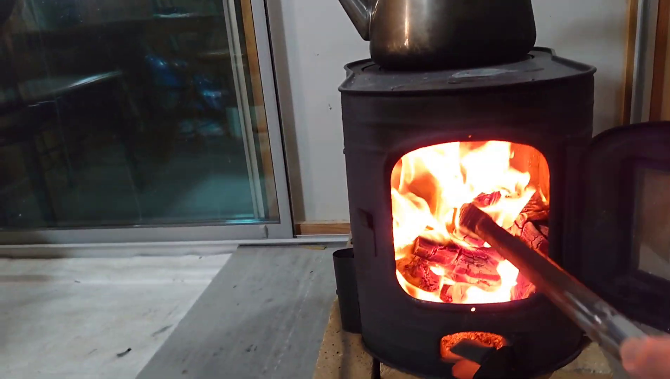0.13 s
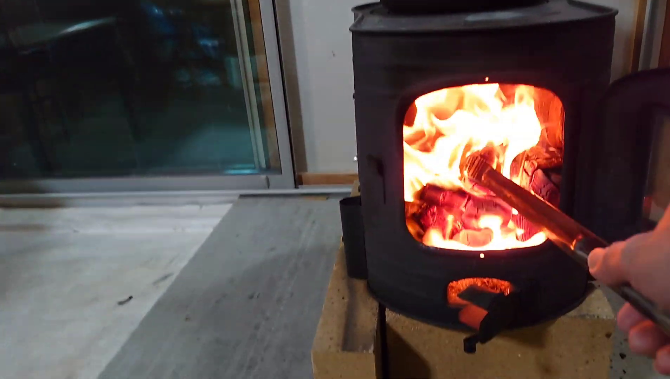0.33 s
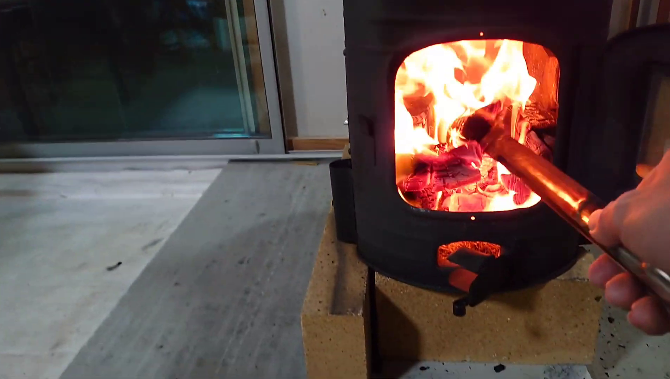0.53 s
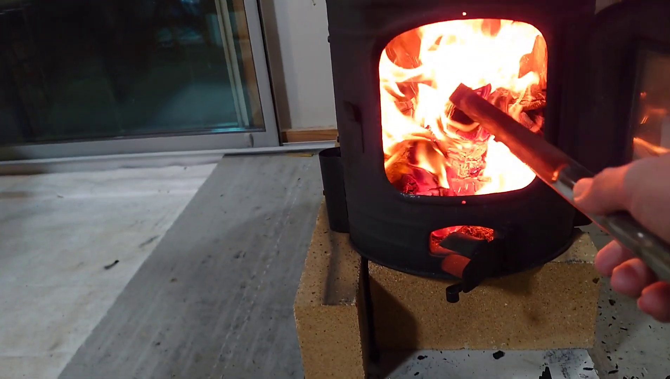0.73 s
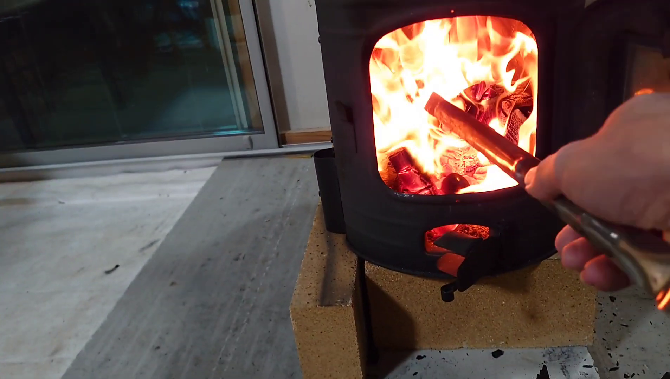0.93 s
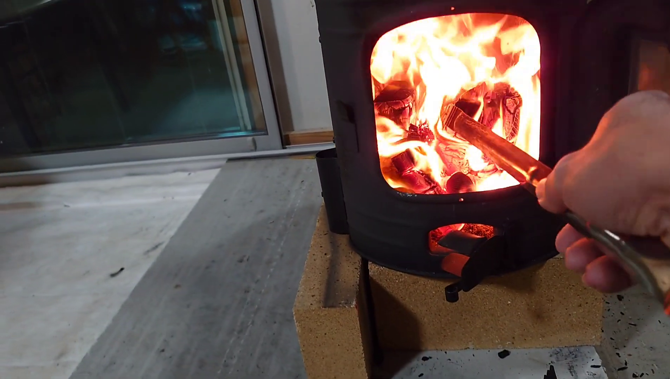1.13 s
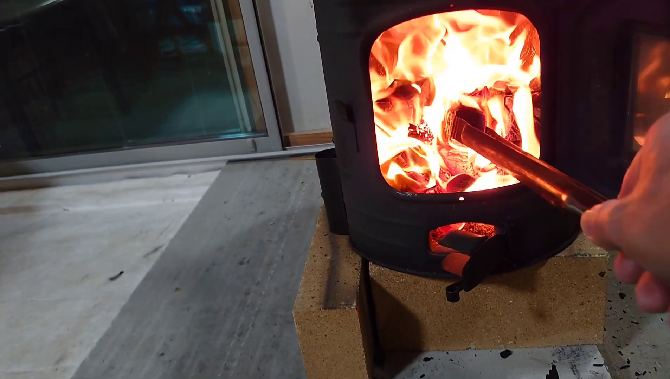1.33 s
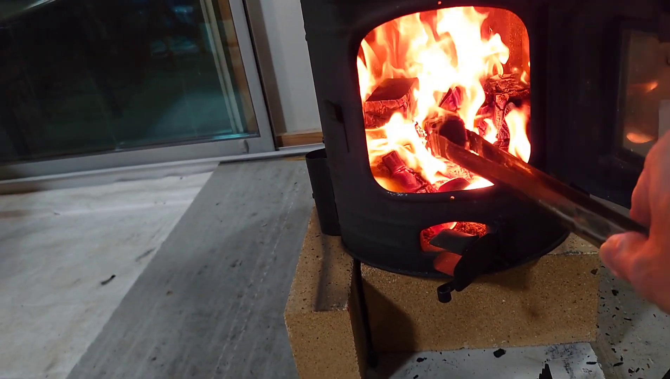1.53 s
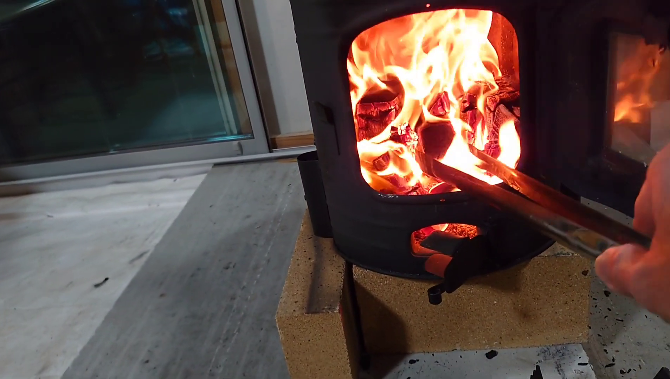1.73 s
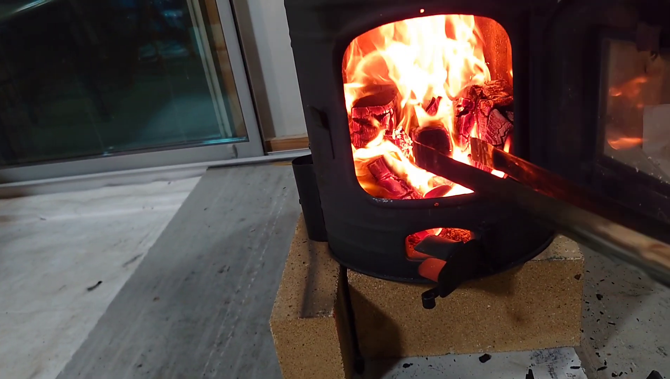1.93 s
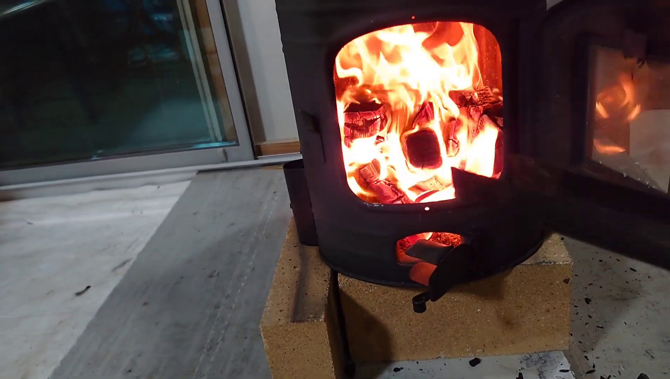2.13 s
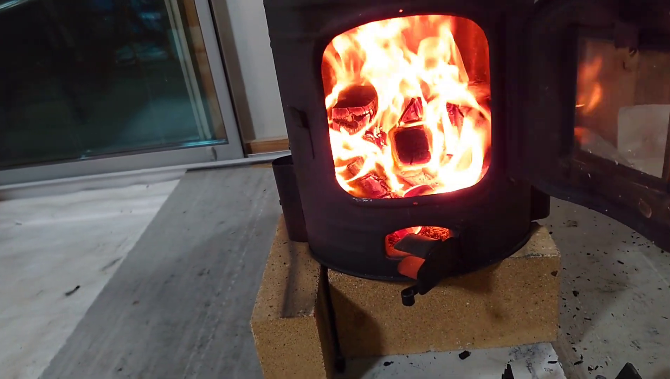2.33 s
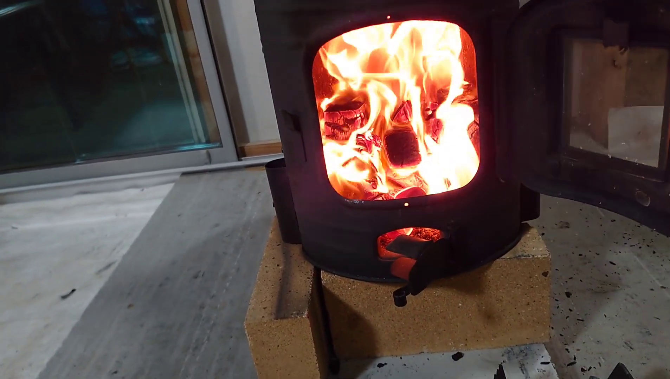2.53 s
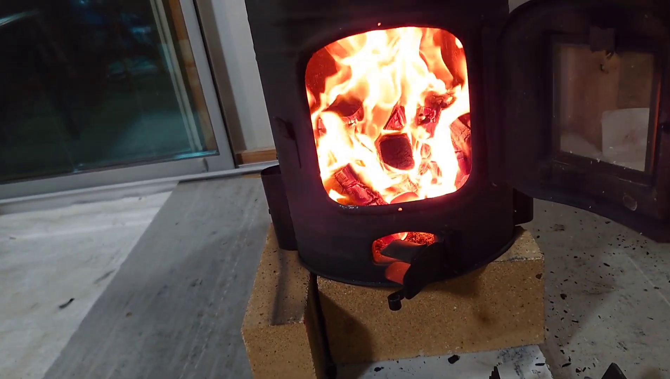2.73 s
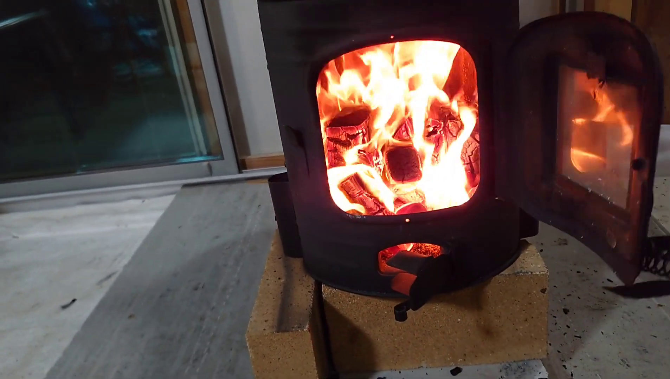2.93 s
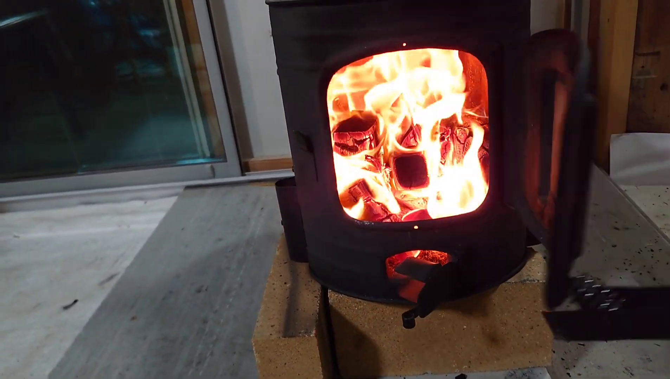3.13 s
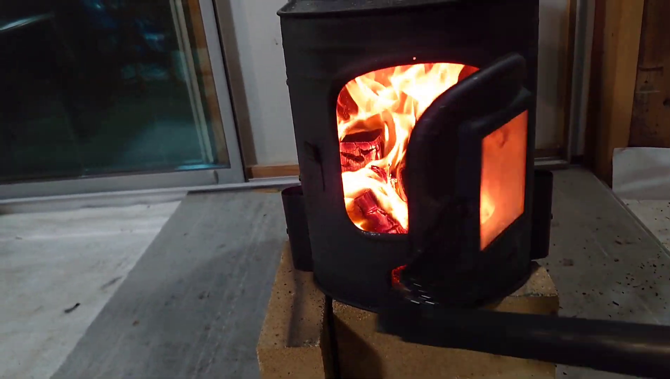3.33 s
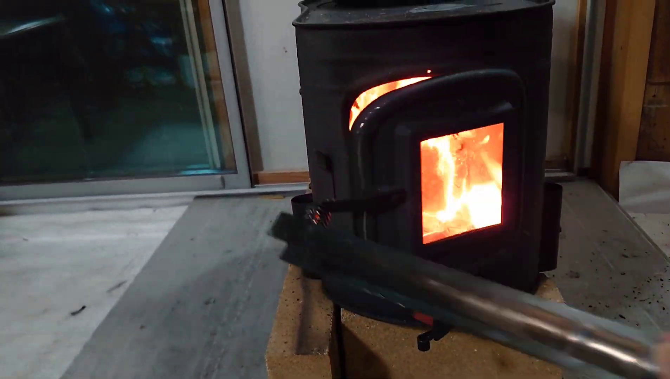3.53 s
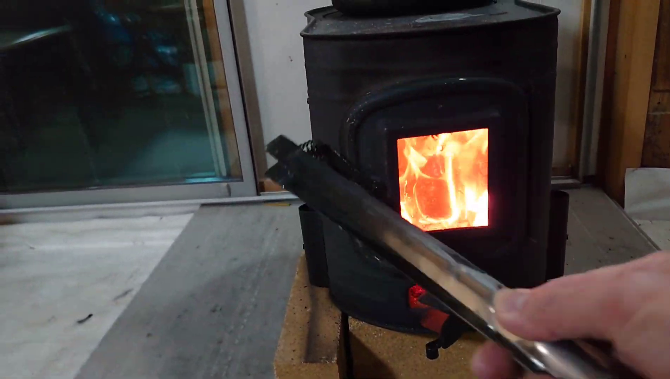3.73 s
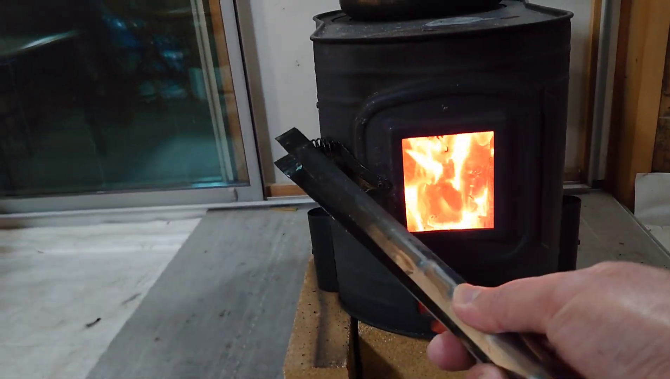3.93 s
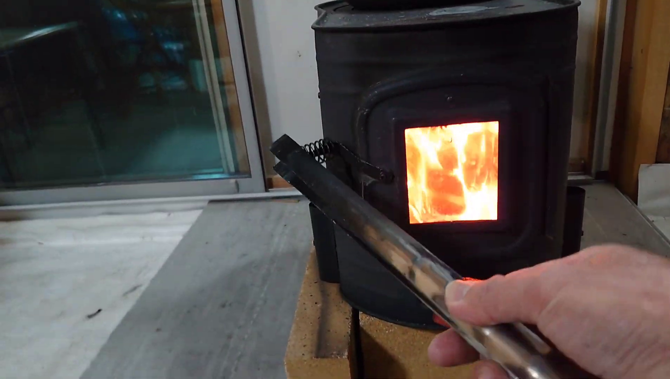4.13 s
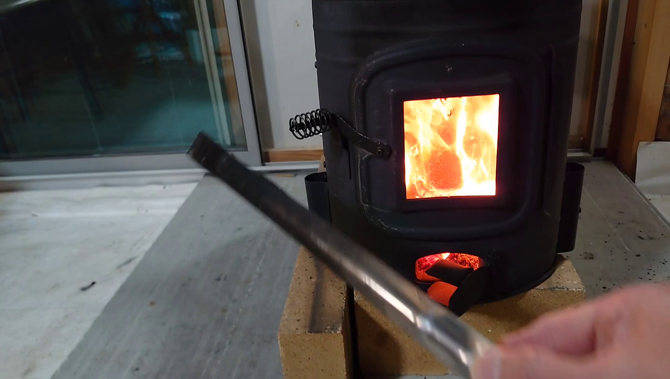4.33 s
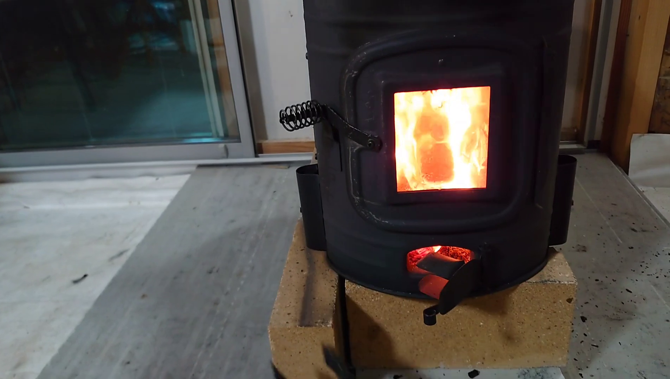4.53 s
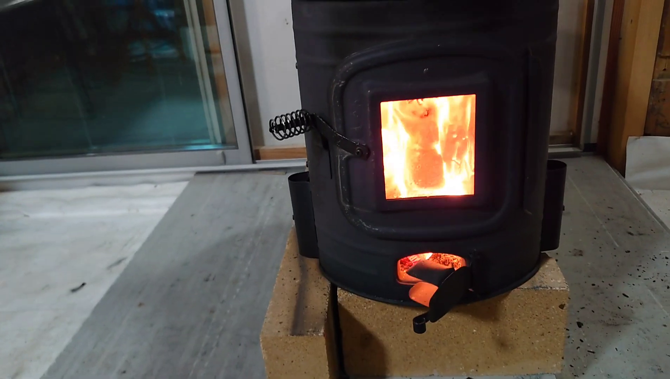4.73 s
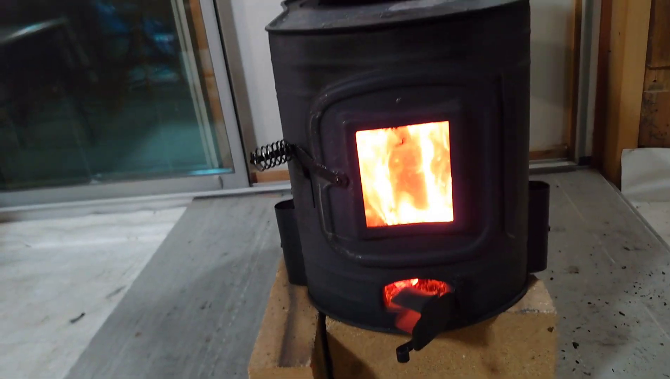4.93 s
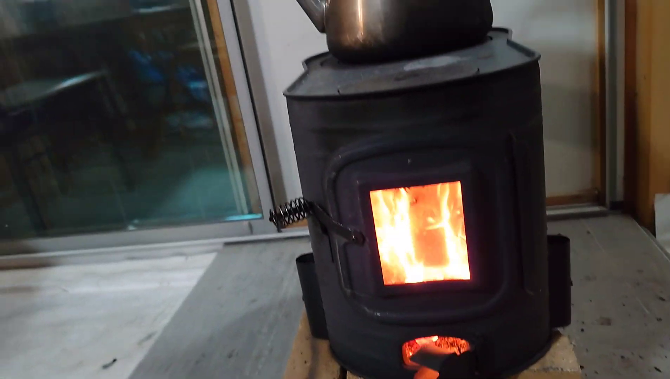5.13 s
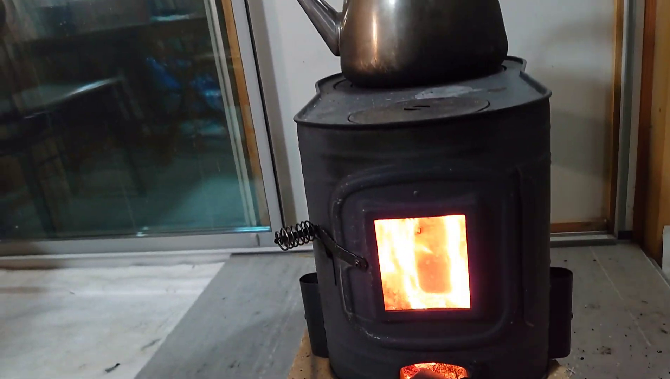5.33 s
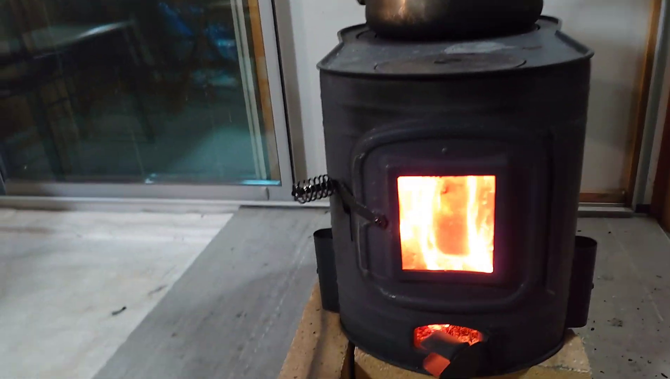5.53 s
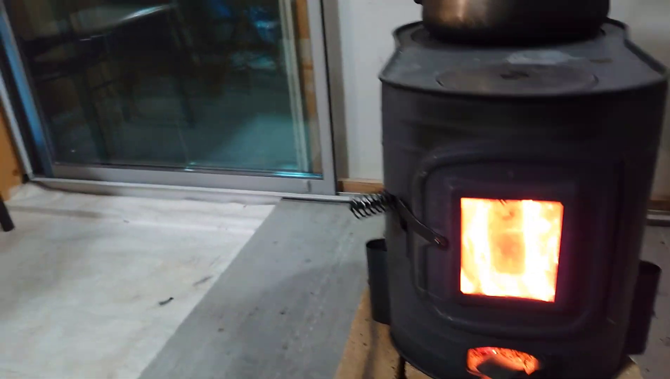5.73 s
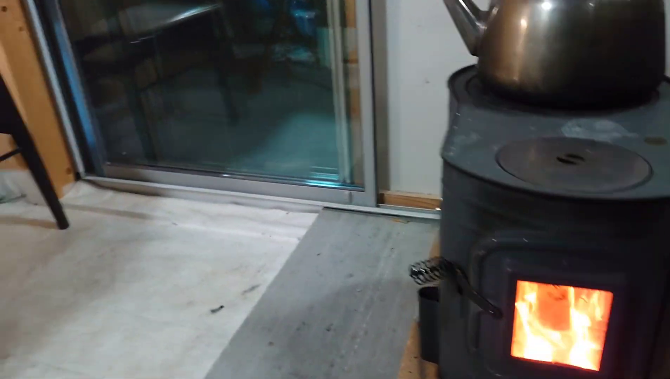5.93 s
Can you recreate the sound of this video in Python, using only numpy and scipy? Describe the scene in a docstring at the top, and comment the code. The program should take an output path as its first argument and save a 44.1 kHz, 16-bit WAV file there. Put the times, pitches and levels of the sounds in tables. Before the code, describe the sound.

Steel tongs poke logs in a wood stove, push its metal door shut, then clatter loudly onto the floor over a softly burning fire.

```python
"""Tongs at a wood stove

Close to a sheet-metal stove in a hard-walled room, on a stereo pair of microphones. Steel tongs push logs
into the fire, swing the door shut by its handle and are dropped on the floor. Each contact shakes the
drum, door or boards, the plates and edges, and the arms of the tongs. Sliding steel squeaks, and the
dropped tongs ring as they bounce. Behind the handling the flames murmur and the burning wood ticks."""
import sys
import numpy as np
from scipy import signal
from scipy.fft import rfft, irfft, next_fast_len
from scipy.io import wavfile
from scipy.ndimage import uniform_filter1d

SR = 44100
rng = np.random.default_rng(int(sys.argv[2]) if len(sys.argv) > 2 else 0)


def file_out(sig):
    """Save sig as 16-bit WAV at sys.argv[1]."""
    # one column per channel
    cols = np.atleast_2d(sig).T
    # limit, then scale
    lim = np.clip(cols, -1, 1)
    pcm = np.round(lim * 32767).astype(np.int16)
    wavfile.write(sys.argv[1], SR, pcm)


N = 263416
LOG_S, DOOR_S, DROP_S, LET_GO_S = 1.75, 2.25, 4.75, 5.15  # tongs reach log, door, floor; leave the hand

# Blows of the tongs. Weight (body), brightness (fizz) and ring (tongs) are relative to the strength:
# (time [s], strength [dB], weight [dB], brightness [dB], ring [dB], chatter decay [s])
BLOWS = [(0.046, -67.5, 30, -6, -7, 0.0046), (0.333, -57.5, 8.5, -29, -18, 0.00084),
         (.463, -55, 4.5, -5, -3, 0.0035), (0.648, -50.5, -18, -6.5, -16, 0.001),
         (.925, -65, 11.5, -5, -26, 0.0025), (1.114, -58, 7.5, -4, -11, 0.0032),
         (1.139, -57.5, -1, -13, -20, 0.0026), (1.185, -62, 12, 1, -11, 0.0033),
         (1.195, -57, -9, -12.5, -12, 0.01), (1.232, -67, 5, 5, -15, 0.0025),
         (1.243, -62.5, 8, -3, -17, 0.0025), (1.258, -74, 25.5, -7, -15, 0.0022),
         (1.455, -65.5, 18, -9.5, -15, 0.0061), (1.521, -56.5, 5, -15, -20, 0.0047),
         (1.896, -40, 4.5, -10, -29, 0.0098), (2.441, -33, -0.5, -2.5, -30, 0.0019),
         (2.468, -38, 10.5, -8.5, -12, 0.016), (2.658, -46, 6, -10.5, -24, 0.014),
         (2.892, -36, 6, -8, 0, 0.0025), (2.957, -27.5, -1.5, 0, -11, 0.0013),
         (3.034, -38.5, -7, -2, 1, 0.0011), (3.076, -38, 0.5, -8, -24, 0.0027),
         (3.106, -51, 15.5, -13, -20, 0.0035), (3.283, -49.5, 11.5, 5, -20, 0.0062),
         (3.336, -50.5, 16.5, 9, -20, .004), (3.353, -39, 0, 13, -23, 0.0015),
         (3.374, -57.5, 8, -7, -20, 0.0027), (3.498, -47, 12.5, -8, -30, 0.0031),
         (3.504, -38, -0.5, -1.5, -30.5, 0.0012), (3.683, -59, 6.5, -16, -21, 0.0023),
         (3.785, -38, -3.5, -11.5, -4, 0.013), (3.882, -41.5, -4, -4, -22, 0.0085),
         (3.989, -41, 3, -28, -22, 0.0027), (4.077, -68, 8, -30, -18, 0.0025),
         (4.054, -46, 2, -16, -17, 0.0018), (4.183, -35, 0, -19.5, -21, 0.0031),
         (4.205, -50, -2, -1.5, -3, 0.0022), (4.22, -51, 18.5, -18, -20, 0.0048),
         (4.298, -32.5, -0.5, -17.5, -30, 0.018), (4.829, -39.5, -3, -18.5, 1.5, 0.0033),
         (5.003, -57, -10, -28, 4.5, 0.0023), (5.004, -50.5, -9, -44, -5.5, 0.048),
         (5.121, -31, -11, -27.5, -3, 0.0098), (5.147, -12.5, -7.5, -31, -6.5, 0.0011),
         (5.153, -17, -29, -16, 2.5, 0.0037), (5.214, -27.5, -0.5, -18, -4, 0.0034),
         (5.228, -29, -4.5, -15.5, 1, .003), (5.244, -27.5, -7.5, -9, -3.5, 0.0017),
         (5.266, -27, -10.5, -9.5, -2.5, .003), (5.293, -29.5, -6.5, -28, 2, 0.0016),
         (5.905, -51, -38, -30, -33.5, 0.0053)]
# Short grinds: (time [s], strength [dB], weight [dB], brightness [dB], ring [dB], rise to full force [s])
SHOVES = [(.06, -57, 22, -15, -13, 0.0028), (.092, -50, -10, -9, -11, 0.0048),
          (0.7, -46, -24, 5, -10, 0.0028), (1.228, -57.5, 18, 6.5, -20, 0.0021),
          (1.515, -50, -1, -20, -20, 0.003), (1.788, -61, 19.5, -6, -15.5, 0.0062),
          (3.269, -41.5, 15.5, 4, -14, 0.0059), (3.311, -39.5, 9.5, 5, -14, 0.012),
          (3.374, -47.5, 12, -8, -9, 0.0068), (3.746, -38.5, -3, -9.5, -3.5, 0.011),
          (3.784, -53, -4, 10.5, -13, 0.0092), (3.879, -43, -6, -13, -7, 0.015),
          (3.985, -54.5, 30, -13, -8, 0.0044), (4.044, -50, 19, -13, 2, 0.0044),
          (4.281, -33, 1.5, -21, -5.5, 0.013), (4.349, -33, 5.5, -14, -25.5, 0.0069),
          (4.38, -51, 7.5, -1, -7, 0.0038), (4.862, -44.5, -1.5, -19, -1.5, .012),
          (5.19, -37.5, 12.5, 5, -4.5, 0.0045), (5.212, -24, 0, -15, -6.5, 0.0085),
          (5.244, -30.5, -7, -6.5, 3, 0.012), (5.3, -23.5, -15.5, -32, -1, 0.01),
          (5.341, -36, 2, -17, -6, 0.0096)]
# Sliding and rattling contact: (time [s], strength [dB], weight [dB], brightness [dB])
SLIDES = [(0, -53.5, -1, -24), (.1, -53, 2.5, -12), (.25, -64, 6.5, -18), (0.439, -68, 2, -11),
          (.5, -59.5, -6, -12), (.63, -69.5, 7.5, 10.5), (.68, -63.5, 9.5, 11.5), (.76, -71, 9, 2),
          (.9, -77, 9, -12.5), (1.1, -77, 9, -3), (1.13, -76.5, -35, 14), (1.33, -69.5, 5.5, 3.5),
          (1.55, -67, 4, 6), (1.74, -68.5, 6, 3), (1.82, -81.5, 5.5, 18), (2.5, -103.5, 23.5, 27),
          (2.6, -55, 2.5, -18.5), (2.75, -68, 1.5, -65), (2.95, -62.5, 6.5, 8), (3.11, -55.5, 10.5, 0),
          (3.199, -59, 14.5, -14), (3.25, -50, -2.5, -9), (3.33, -58, 7.5, -2), (3.45, -52.5, 5.5, -7),
          (3.551, -61, 13.5, 1.5), (3.7, -61, 5, -8.5), (3.902, -50.5, -4, -3.5), (4.03, -56, 10, -17),
          (4.14, -68, 17, -15), (4.311, -42, 1, -35), (4.43, -72.5, 15, -11), (4.599, -90, 19.5, -18),
          (5.14, -75, 10, -18), (5.302, -41.5, 5.5, -5.5), (5.42, -61, -11, -13), (5.551, -72.5, 0, -14.5),
          (5.97, -69.5, -12.5, -13)]
# What the tongs work on, in turn embers, log, door, latch, floor and loose bounces:
# (start [s], plates [dB], rims [dB], edges [dB], fizz [dB])
SURFACES = [(0, -1.5, 0, 1, -3), (1.851, 8.5, 1.5, 3.5, -7), (2.3, -5, 0.2, 3, 0), (3.95, 0, 0, 5, 6),
            (4.75, 3, -2, 14, 0.4), (5.14, 4, 0, 2, -1.5)]
# The voice of the swinging door: (time [s], pitch [factor], lean to high modes [dB/octave], deep modes [dB])
DOOR_SWING = [(2.3, 1.008, 6, -1.5), (2.6, 1.03, 3.5, -2.5), (2.9, 0.96, -8.5, -4), (3.048, 0.96, -2.5, -3),
              (3.17, 0.91, -1.5, -14), (3.3, 0.91, 5.5, 20), (3.42, 0.93, 7.5, 2), (3.55, 0.97, -4, 0.8),
              (3.75, 0.913, 18, 6), (4.0, 1.02, 13.5, -3), (4.2, 1.03, 0.5, 0), (4.33, 0.9, -4.5, -5.5),
              (4.6, 1.08, -7.5, -0.5)]
# Single steel tones: squeaks of sliding steel, then the dropped tongs ringing as they bounce:
# (start [s], end [s], frequency [Hz], level [dB])
STEEL_TONES = [(0.134, 0.302, 1306, -64.5), (0.145, 0.304, 2245, -69), (.66, 0.738, 4180, -60.5),
               (1.11, 1.124, 4900, -63), (1.232, 1.247, 3500, -67), (1.238, 1.257, 5100, -64),
               (.781, 0.793, 4100, -52), (0.784, 0.791, 5110, -53), (0.45, 0.508, 4200, -64),
               (0.652, 0.735, 3420, -64), (3.076, 3.11, 2505, -45), (3.315, 3.336, 3460, -45.5),
               (3.34, 3.375, 4110, -42), (3.627, 3.656, 3020, -57), (3.681, 3.777, 801, -55.5),
               (3.79, 3.986, 821, -56), (3.814, 3.874, 4140, -48), (3.902, 3.995, 4210, -53),
               (3.943, 3.964, 3545, -37.5), (3.984, 4.002, 756, -40.5), (4.05, 4.07, 894, -40.5),
               (4.053, 4.073, 1970, -48.5), (4.066, 4.09, 700, -45), (4.18, 4.198, 1640, -41.5),
               (4.2, 4.25, 1650, -52), (4.184, 4.192, 2500, -46), (4.24, 4.278, 980, -60),
               (4.293, 4.32, 1610, -42), (4.314, 4.33, 741, -40.5), (3.882, 3.93, 2570, -51),
               (4.287, 4.319, 1850, -40), (4.29, 4.325, 2320, -46), (4.39, 4.44, 3140, -62),
               (4.287, 4.314, 1015, -40), (4.346, 4.417, 1624, -47.5), (4.827, 4.845, 3190, -47),
               (4.831, 4.883, 3420, -51), (4.83, 4.896, 2810, -59), (4.84, 4.968, 4178, -59.5),
               (5.158, 5.222, 4198, -35.5), (5.23, 5.3, 4180, -40.5), (5.325, 5.5, 4200, -55.5),
               (5.25, 5.36, 5150, -52), (4.998, 5.105, 5120, -72), (5.263, 5.362, 2890, -38),
               (5.914, 5.946, 2420, -59.5)]
# Dry snaps, mostly ticks of burning wood, with a few small knocks and a tink of the tongs: (time [s], relative
# level [dB], centre [Hz], treble [dB])
TICKS = [(0.783, -45, 4260, -2), (0.873, -72, 3000, 10), (0.91, -75, 4000, 14), (0.9587, -68, 3980, 16),
         (1.001, -67, 3500, -2), (1.0396, -68, 4470, 12), (1.043, -64, 3000, 9), (1.0607, -52, 3000, 4),
         (1.138, -55, 980, -20), (1.3787, -51, 3000, 7), (1.828, -57, 3040, -7), (2.156, -55, 2570, -1),
         (2.276, -66, 4970, 15), (2.35, -48, 4000, 4), (2.372, -62.5, 1150, -17), (2.6, -55, 2000, 4),
         (2.7768, -78, 3480, 22), (2.8024, -57.5, 3800, 0), (2.841, -63, 3550, 16), (3.162, -59, 4940, 13),
         (3.222, -58, 4980, 7)]

# Ringing modes: (frequency [Hz], relative level [dB], t60 [s])
DRUM_MODES = [(63.4, -8.5, 0.13), (104, -10, 0.15), (117.3, -11, 0.75), (172, 1.5, 0.43), (200, 6.5, 0.18),
              (239.8, 2.5, 0.24)]
DOOR_MODES = [(112.1, -6, 0.42), (167, -10, 0.034), (189, -4, 0.26), (186.8, -1.5, 0.18),
              (219.3, -0.7, 0.27), (222.9, 0.5, 0.29), (249.1, 2, 0.3)]  # cast door
BOARD_MODES = [(121, -25, 0.14), (168.5, -6.5, 0.45), (200.2, 9, 0.078), (244, -4, 0.26), (304, -22, 0.23),
               (378, -2, 0.2)]  # thud of the floor
HELD_TONG_MODES = [(1320, -4, 0.1), (1803, 1, 0.15), (2250, -8, 0.25), (2541, -9, .3), (2896, -5, 0.18),
                   (3150, -6, .08), (3450, -3, 0.24), (4183, -6, 0.45), (4200, -10, .35), (4597, -9, .16),
                   (5140, -10, 0.3)]
LOOSE_TONG_MODES = [(356, -3, .25), (429, -1, .42), (501, -8, .25), (575, -6, .3), (1328, -2, .25),
                    (1810, -4, .27), (1938, 2, .3), (2110, -8, .3), (2226, 1, .3), (2352, -8, .25),
                    (2514, -4, .28), (2895, -11, .28), (3496, -14, .75), (3509, -17, .9), (3811, -10, .3),
                    (4194, -4, .55), (4206, -9, .55), (5152, -13, .35)]

# Spectra of crowded modes and of noise: (frequency [Hz], relative level [dB])
PLATE_COLOUR = [(190, -13), (330, -0.5), (504, -6), (684, 1.5), (1500, -5.5), (1950, -39.5), (3300, -120)]
LOG_COLOUR = [(190, -5), (260, -0.5), (420, -4), (520, -8.5), (650, -2.5), (800, -2.5), (1070, -6.5),
              (1250, -12.5), (1950, -17), (3300, -120)]  # a log against the stove wall
KNOCK_COLOUR = [(190, -19), (330, -5), (428, -8.5), (527, -7), (587, -5), (1240, -8.5), (1500, -10.5),
                (1950, -42), (3300, -120)]  # floorboards
RIM_COLOUR = [(1100, -25), (1400, -2), (1650, -3), (2100, 2), (2900, -3), (3600, -40)]
EDGE_COLOUR = [(1710, -39.5), (2900, -8), (4400, -9.5), (4960, -10.5), (5800, -33), (7540, -46),
               (12800, -120)]
EMBER_FIZZ = [(3240, -13.5), (5200, -6), (6000, -7.5), (8160, -13), (11000, -8), (13000, -1.5), (15100, 2),
              (15700, -17), (16500, -48)]  # fizz is the top treble of a contact
DOOR_FIZZ = [(3240, -10), (5500, -1), (5970, -9), (6700, -3), (8160, -11.5), (11800, -7.5), (15100, -5.5),
             (15700, -12.5), (16500, -25.5)]
FLOOR_FIZZ = [(3240, -8.5), (5300, -4.5), (6000, 0), (8000, -11.5), (11000, -7.5), (14000, -9.5),
              (15300, -14), (16500, -31)]
TICK_COLOUR = [(500, -12.5), (1000, -2.5), (2000, -4), (5200, 0.5), (6200, -16.5), (8000, -13.5),
               (11000, -3.5), (16000, -4)]
FIRE_COLOUR = [(15, -50.5), (25, -1), (84, 0), (175, 1.5), (427, -29.5), (531, -26), (714, -23.5),
               (1190, -30.5), (1700, -28.5), (4740, -40), (7510, -59), (11000, -41.5), (16000, -39)]

# Decay of sheet metal, floor and room: (frequency [Hz], t60 [s])
SHEET_T60 = [(300, 0.39), (1000, 0.32), (3000, 0.13), (6000, 0.093), (14000, 0.094)]
FLOOR_T60 = [(300, 0.17), (1000, 0.11), (3000, 0.038), (6000, 0.095), (14000, 0.36)]
ROOM_T60 = [(100, 0.91), (500, 0.43), (2000, 0.53), (6000, 0.32), (14000, 0.33)]

# Where the hand works, heard from the microphones: (time [s], left lag [ms], left over right [dB])
HAND_POSITION = [(0, 0.12, 1), (.9, 0.22, 2), (1.201, 0.089, 2), (2.8, 0.24, 1.5), (3.101, 0.099, 0),
                 (3.9, 0.062, 0), (4.6, .09, 3.5), (5.098, 0.11, -1.5), (5.45, 0.16, 3.5),
                 (5.97, 0.38, 1.5)]
# Likeness of the two microphone signals: (frequency [Hz], coherence [0-1])
MIC_COHERENCE = [(60, 0.97), (290, 0.94), (640, 0.36), (1400, 0.19), (4000, 0.43), (15000, 0.083)]
# Imbalance of the microphone ports: (frequency [Hz], left over right [dB])
MIC_BALANCE = [(25, -3), (60, 4), (125, 2.5), (250, 1), (600, -0.5), (2000, 0.5), (5000, -1.5),
               (9000, -1.5), (15000, 0.5)]


def steel():
    """Close up, tongs on stove and floor: each force rings its own part as the contact point moves."""
    force = placed(contact_forces())
    out = np.zeros((2, N + SR))
    drum = ringing(DRUM_MODES, spread_rad=0.085)
    boards = ringing(BOARD_MODES, spread_rad=0.065)
    hop = SR // 14  # a fresh mix of modes 14 times a second
    for at in range(0, N, hop):
        if at >= DROP_S * SR:
            body, plates, fizz, t60 = boards, KNOCK_COLOUR, FLOOR_FIZZ, FLOOR_T60
        elif at >= DOOR_S * SR:
            body = ringing(swinging_door((at + hop / 2) / SR), spread_rad=0.13)
            plates, fizz, t60 = PLATE_COLOUR, DOOR_FIZZ, SHEET_T60
        else:
            plates = LOG_COLOUR if at >= LOG_S * SR else PLATE_COLOUR
            body, fizz, t60 = drum, EMBER_FIZZ, SHEET_T60
        parts = [dying_noise(plates, t60, alike=0.97, crack=7.0),
                 body,
                 dying_noise(RIM_COLOUR, t60, alike=1.0, crack=5.8),
                 dying_noise(EDGE_COLOUR, t60, alike=0.42, crack=7.6, seconds=0.16),
                 dying_noise(fizz, t60, alike=0.24, crack=1.9, seconds=0.22)]
        for k, part in enumerate(parts):
            sound = signal.fftconvolve(force[:, k, at:at + hop], part, axes=1)
            out[:, at:at + sound.shape[1]] += sound
    loose = np.arange(N) >= LET_GO_S * SR
    for when, modes in (~loose, HELD_TONG_MODES), (loose, LOOSE_TONG_MODES):
        arms = ringing(modes, spread_rad=0.35, seconds=1)
        out[:, :N] += signal.fftconvolve(force[:, -1] * when, arms, axes=1)[:, :N]
    return out[:, :N]


def contact_forces():
    """Six force trains, one for each part: slides stick and slip, blows chatter, shoves swell and fade."""
    t = np.arange(N) / SR
    slips_per_s = 2500
    slip_db = 6.03 * np.minimum(rng.exponential(1, N), 4)
    grit = gain_of(slip_db) * rng.standard_normal((6, N))
    grit = unit_rms(grit * (rng.random(N) < slips_per_s / SR))
    times, *controls = np.transpose(SLIDES)
    force = part_gains(t, *[np.interp(t, times, db) for db in controls], ring_db=-23.5) * grit
    for s, *contact, chatter_s in BLOWS:
        burst = rng.standard_normal((6, 2000)) * np.exp(-t[:2000] / chatter_s)
        burst[:, 0] = 6.4  # the first touch is the hardest
        burst[[1, 5], 1:] *= 0.2  # body and tongs ring free after it
        burst /= np.linalg.norm(burst, axis=1)[:, None]
        at = round(s * SR)
        force[:, at:at + 2000] += 20 * part_gains(s, *contact)[:, None] * burst
    for s, *contact, rise_s in SHOVES:
        age = t[:4000] / rise_s
        grind = rng.standard_normal((6, 4000)) * age * np.exp(-age)
        at = round(s * SR)
        force[:, at:at + 4000] += part_gains(s, *contact)[:, None] * grind
    return force


def part_gains(s, strength_db, weight_db, bright_db, ring_db):
    """How hard a contact at time s drives plates, body, rims, edges, fizz and tongs."""
    start, plate_db, rim_db, edge_db, fizz_db = np.transpose(SURFACES)
    surface = np.searchsorted(start[1:], s)
    part_db = [plate_db[surface] + 0.56 * weight_db,
               weight_db,
               rim_db[surface],
               edge_db[surface] + 0.5 * bright_db,
               fizz_db[surface] + bright_db,
               np.full(np.shape(s), ring_db)]
    return gain_of(strength_db + np.array(part_db))


def swinging_door(s, wander=0.03, scatter_db=2.8, deep_hz=130):
    """The door's modes at time s: they shift and trade strength with the swing and the contact point."""
    times, *curves = np.transpose(DOOR_SWING)
    pitch, lean_db, deep_db = [np.interp(s, times, curve) for curve in curves]
    hz, db, t60 = np.transpose(DOOR_MODES)
    shift, trade = rng.standard_normal((2, len(hz)))
    db = db + lean_db * np.log2(hz / hz[-1]) + deep_db * (hz < deep_hz)
    return np.transpose([hz * pitch * (1 + wander * shift), db + scatter_db * trade, t60])


def ringing(modes, spread_rad, seconds=0.517):
    """Struck modes as dying sines; each reaches the two microphones a little out of step."""
    hz, db, t60 = np.transpose(modes)[:, :, None]
    t = np.arange(int(seconds * SR)) / SR
    phase = spread_rad * rng.standard_normal((2, len(modes), 1))
    envelope = gain_of(db - 60 * t / t60) * np.minimum(t * hz * 2, 1)
    return unit_energy((envelope * np.sin(2 * np.pi * hz * t + phase)).sum(1))


def dying_noise(colour, t60, alike, crack=0., seconds=0.3):
    """Crowded modes at both microphones: a first crack, then noise, each band dying at its own speed."""
    noise = rng.standard_normal((2, int(seconds * SR)))
    hz, t, bands = signal.stft(noise, SR, nperseg=128)
    coherence = np.clip(alike * at_hz(MIC_COHERENCE, hz), 0, 1)[:, None]
    bands[1] = coherence * bands[0] + np.sqrt(1 - coherence ** 2) * bands[1]
    decay = gain_of(-60 * t / at_hz(t60, hz)[:, None])
    tail = signal.istft(bands * decay, SR, nperseg=128)[1]
    tail[:, 0] += crack
    size = 2 * next_fast_len(len(tail[0]))
    colour_db = np.maximum(at_hz(colour, abs(np.fft.fftfreq(size, 1 / SR))), -80)
    causal = np.exp(np.conj(signal.hilbert(np.log(gain_of(colour_db)))))  # no sound before the contact
    coloured = np.fft.ifft(np.fft.fft(tail, size) * causal).real
    return unit_energy(coloured[:, :size // 2])


def steel_tones():
    """Single trembling tones: squeaks of sliding steel, then the dropped tongs ringing as they bounce."""
    out = np.zeros((2, N))
    noise = rng.standard_normal((len(STEEL_TONES), 2, SR // 4))
    tremble = uniform_filter1d(noise, 300, axis=2) * np.sqrt(300)
    phases = rng.uniform(-0.7, 0.7, len(STEEL_TONES))  # a long arm reaches the microphones out of step
    for (start, end, hz, db), (level, pitch), phase in zip(STEEL_TONES, tremble, phases):
        n = int((end - start) * SR)
        cycles = np.cumsum(hz * (1 + 0.001 * pitch[:n])) / SR
        swell = np.sin(np.pi * np.linspace(0, 1, n) ** 0.6) * gain_of(db + 2.5 * level[:n])
        at = round(start * SR)
        out[:, at:at + n] += np.sqrt(2) * swell * np.sin(2 * np.pi * cycles + [[phase], [-phase]])
    return out


def dry_snaps():
    """Dry snaps, a pop and a crack each: the listed ones, mostly wood cells bursting in the stove with a few
    small knocks of the tongs, plus 60 faint wood ticks at random."""
    out, t = np.zeros(N + 400), np.arange(300) / SR
    faint = rng.random((60, 4)) * [N / SR, 9, 4000, 10] + [0, -78.5, 1493, 1]  # columns as in TICKS
    for s, db, hz, treble_db in [*faint, *TICKS]:
        pop = np.sin(2 * np.pi * hz * t) * np.exp(-t * hz / 1.1)  # about one swing
        crack = gain_of(treble_db) * np.diff(rng.standard_normal(301)) * np.exp(-t / 0.00034)
        at = round(s * SR)
        out[at:at + 300] += gain_of(db + 17) * (pop + 0.23 * crack)
    size = next_fast_len(N)
    colour = gain_of(at_hz(TICK_COLOUR, np.fft.rfftfreq(size, 1 / SR)))
    return placed(irfft(rfft(out[:N], size) * colour, size)[:N])


def fire(level_db=-56.5):
    """The draught of the flames, behind the handling: lumpy, fluttering low noise with a thin hiss."""
    frames, hz = N // 256 + 5, np.fft.rfftfreq(1024, 1 / SR)
    left_re, left_im, apart_re, apart_im, patches = rng.standard_normal((frames, 513, 5)).T
    patches = unit_rms(uniform_filter1d(uniform_filter1d(patches, 10, axis=0), 12, axis=1))
    flutter = unit_rms(uniform_filter1d(rng.standard_normal(frames), 8))
    coherence = at_hz(MIC_COHERENCE, hz)[:, None]
    left = left_re + 1j * left_im
    right = coherence * left + np.sqrt(1 - coherence ** 2) * (apart_re + 1j * apart_im)
    band_db = at_hz(FIRE_COLOUR, hz)[:, None] + 1.5 * patches + 3.6 * flutter * (hz[:, None] < 350)
    draught = signal.istft(np.array([left, right]) * gain_of(band_db), nperseg=1024, noverlap=768)[1]
    return gain_of(level_db) * unit_rms(draught[:, :N])


def room(x):
    """The hard walls answer about 7 ms later, with a tail that is unlike at the two microphones."""
    tail = dying_noise([(20, -4.5), (16000, -5.0)], ROOM_T60, alike=0.88, seconds=0.83)
    delayed = np.pad(tail, ((0, 0), (300, 0)))
    return signal.fftconvolve(x.mean(0)[None], delayed, axes=1)[:, :N]


def placed(x):
    """Sets a sound where the hand works, by delay and level between the microphones."""
    times, lag_ms, left_db = np.transpose(HAND_POSITION)
    t = np.arange(N) / SR
    lag = np.round(np.interp(t, times, lag_ms) * SR / 1000).astype(int)
    late = np.clip(np.arange(N) - lag, 0, N - 1)
    tilt = gain_of(np.interp(t, times, left_db) / 2)
    return np.array([x[..., late] * tilt, x / tilt])


def gain_of(db):
    """Decibels to a factor."""
    return 10 ** (np.asarray(db) / 20)


def at_hz(table, hz):
    """Interpolates a table over log frequency."""
    points_hz, values = np.transpose(table)
    return np.interp(np.log(hz + 1), np.log(points_hz + 1), values)


def unit_rms(x):
    """Scales to rms 1."""
    return x / np.sqrt(np.mean(x ** 2) + 1e-20)


def unit_energy(response):
    """Scales a stereo response to energy 1 at the left microphone."""
    return response / np.linalg.norm(response[0])


def scene():
    """Beside the stove: steel up close, ticking wood, the room's answer and the fire underneath."""
    near = steel() + steel_tones()
    ticks = dry_snaps()
    walls = room(gain_of(-13.0) * near + gain_of(-21.5) * ticks)
    return near + ticks + walls + fire()


def record(dry):
    """The stereo microphone: unequal ports that lose the bass under 65 Hz, and a 16.4 kHz band limit."""
    size = next_fast_len(N)
    tilt = gain_of(at_hz(MIC_BALANCE, np.fft.rfftfreq(size, 1 / SR)) / 2)
    ports = irfft(rfft(dry, size) * [tilt, 1 / tilt], size)[:, :N]
    ports = signal.sosfilt(signal.butter(2, 65, "high", fs=SR, output="sos"), ports)
    band_limit = signal.firwin(511, 16400, window=("kaiser", 9), fs=SR)
    return signal.oaconvolve(ports, band_limit[None], "same")


dry = scene()
out = record(dry)
file_out(out)
```